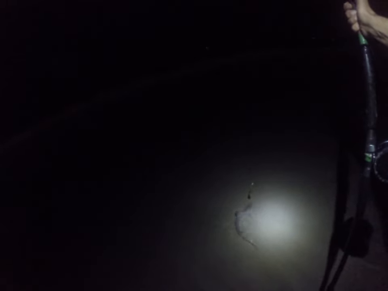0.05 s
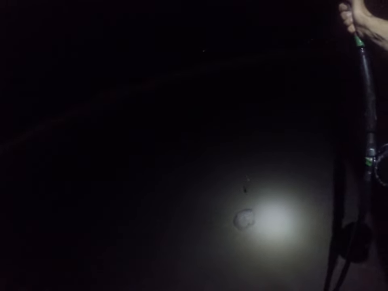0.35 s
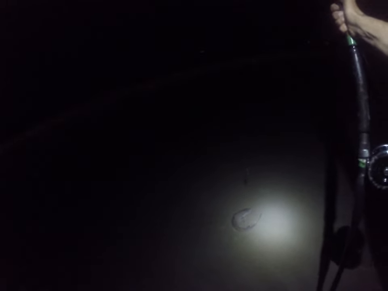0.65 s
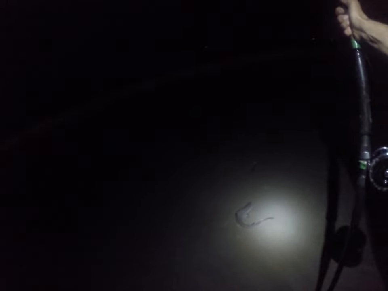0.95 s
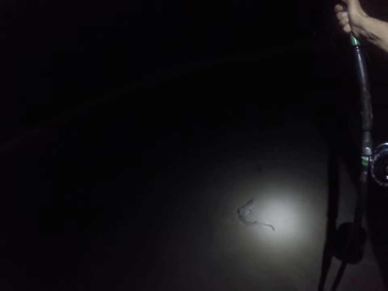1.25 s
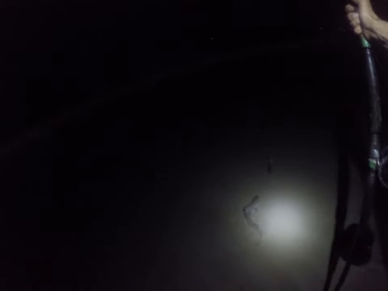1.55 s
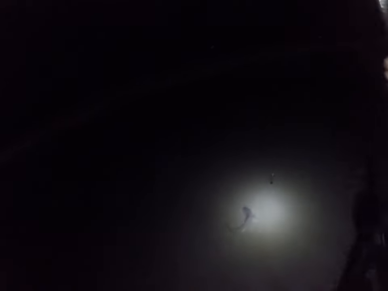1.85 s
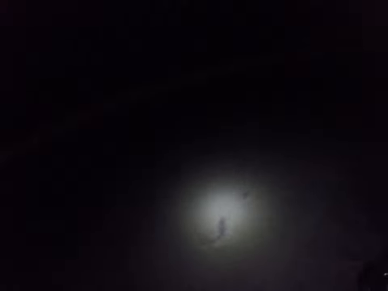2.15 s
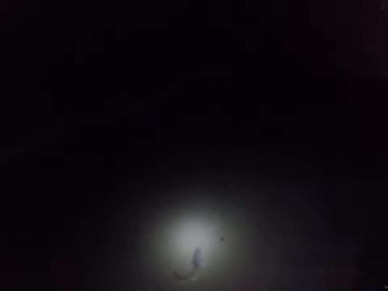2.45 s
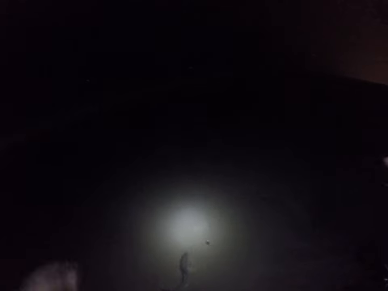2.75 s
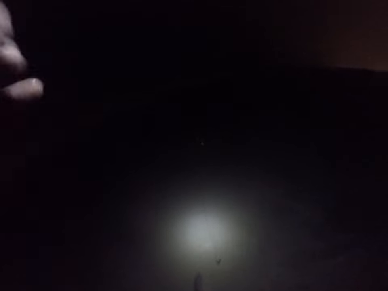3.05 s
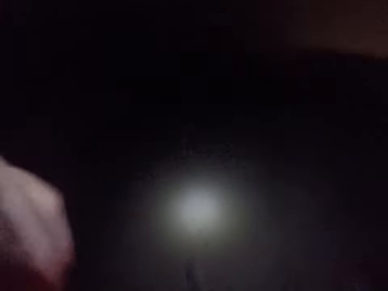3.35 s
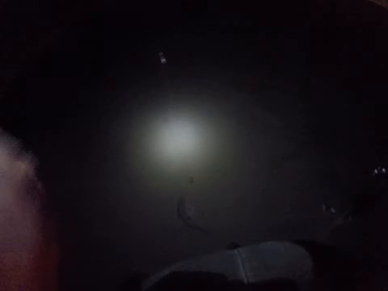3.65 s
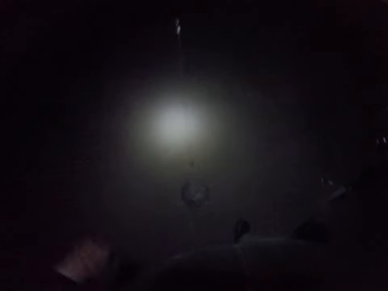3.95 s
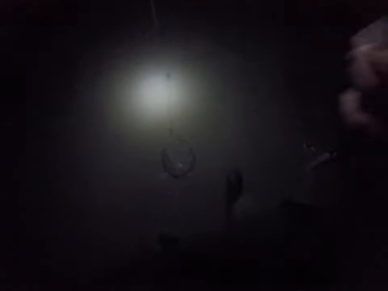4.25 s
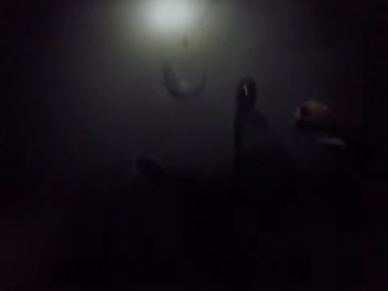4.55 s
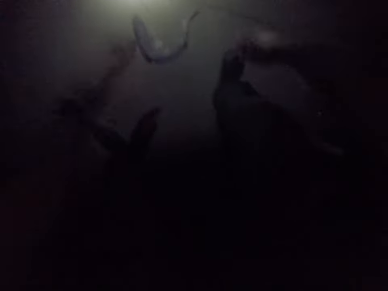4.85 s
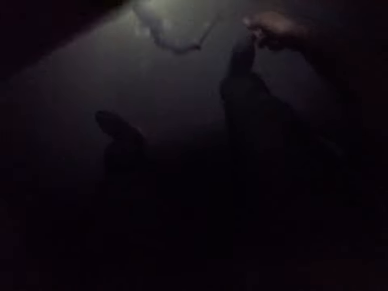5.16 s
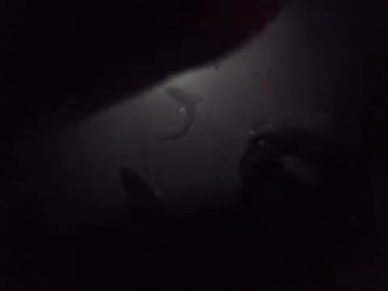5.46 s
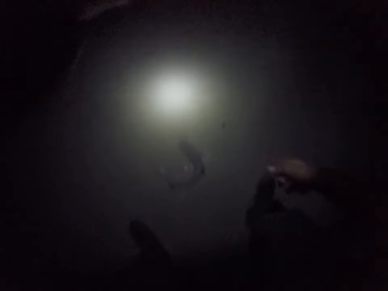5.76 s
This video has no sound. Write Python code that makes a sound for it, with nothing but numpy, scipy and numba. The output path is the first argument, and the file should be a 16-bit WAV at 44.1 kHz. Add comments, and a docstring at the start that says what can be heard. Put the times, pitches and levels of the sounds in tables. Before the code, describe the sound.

Surf roars quietly and steadily throughout on a night beach, sounding slightly hollow through a small camera's housing, with a barely audible high electronic whine. For the first three seconds the swaying camera gives soft, deep, evenly spaced bumps. Clothes swish at about 0.7 seconds, and between 1.7 and 2.8 seconds come a few light knocks, brief rustles and a rumble of wind. From about 3.2 to 3.7 seconds fingers grip the camera: gritty rubbing, deep thumps of air and sharp plastic knocks, loud enough to distort. The surf ducks, then creeps back. Around 4.3 to 5 seconds clothing rustles softly under another low gust. From about 5.1 to 5.8 seconds a second loud cluster of scrapes, thumps and clacks hits the case, pushing the surf down again.

```python
"""A night beach, heard through the housing of a small camera. Surf roars steadily, coloured by the
cavities in front of the microphone; a gusty breeze rumbles on the port and a fisherman's clothes rustle.
Twice the camera is gripped: fingers rub over the case, press air into the port and knock on the plastic,
loud enough to clip; the gain control ducks, and the surf creeps back. Underneath, the swaying camera
bumps softly and its electronics whine."""
import sys
import numpy as np
from scipy import signal
from scipy.fft import rfft, irfft, next_fast_len
from scipy.io import wavfile
from scipy.ndimage import uniform_filter1d
from numba import njit

SR = 44100
rng = np.random.default_rng(int(sys.argv[2]) if len(sys.argv) > 2 else 0)


def transcribe(u):
    """Save the signal u as a 16-bit wav file named by the first command-line argument.

    u: samples, shape (n,) or (channels, n), limited to [-1, 1]; the rate is SR.
    q: integer samples, one column per channel.
    """
    v = np.clip(np.atleast_2d(u).T, -1, 1)
    q = np.round(v * 32767).astype(np.int16)
    wavfile.write(sys.argv[1], SR, q)


N = 256220


def undb(db):
    """Decibels to gain."""
    return 10 ** (np.asarray(db) / 20)


def unit(x):
    """Scale to rms 1."""
    return x / np.sqrt(np.mean(x ** 2))


def curve(rows):
    """An automation curve through (time, value) points."""
    return np.interp(np.arange(N) / SR, *np.transpose(rows))


def add(track, at, sound):
    """Mix a sound in at a time in seconds."""
    start = int(at * SR)
    track[start:start + len(sound)] += sound[:N - start]


def colour(x, points, lifts=(), tilt_db=0):
    """EQ by a smooth spectrum, resonant lifts and a tilt per octave; comes out at rms 1."""
    size = next_fast_len(len(x))
    f = np.maximum(np.arange(size // 2 + 1) * SR / size, 1)
    hz, db = np.transpose(points)
    gain_db = np.interp(np.log(f), np.log(hz), db) + tilt_db * np.log2(f)
    for centre, width, lift_db in lifts:
        gain_db += lift_db * .5 ** ((2 * (f - centre) / width) ** 2)
    return unit(irfft(rfft(x, size) * undb(gain_db), size)[:len(x)])


def walk(rate_hz):
    """Smooth random drift at rms 1."""
    k = int(SR / rate_hz)
    steps = np.repeat(rng.standard_normal(N // k + 1), k)
    return unit(uniform_filter1d(uniform_filter1d(steps, k), k)[:N])


@njit
def running_sum(steps, top):
    """Add up steps, staying between zero and a top."""
    out, total = np.empty(len(steps)), 0.
    for i in range(len(steps)):
        total = min(max(total + steps[i], 0.), top)
        out[i] = total
    return out


def stroke(rise, fall, spectrum, grain_db, tilt_db=0, catch=0, hold=0):
    """Friction: countless tiny slips and optional sharp catches, reaching full level mid-buffer."""
    size, grain = 2 ** 15, 32  # samples
    t = np.arange(-size // 2, size // 2) / SR
    slips = rng.standard_normal(size)
    slips *= undb(grain_db * np.repeat(rng.standard_normal(size // grain), grain))
    catches = (rng.random(size) < 160 / SR) * rng.standard_normal(size)  # about 160 a second
    release = np.maximum(t - hold, 0)
    edge = np.where(t < 0, t / rise, release / fall)
    swell = np.exp(-edge ** 2 / 2 ** .5)
    graze = undb(-14) * np.exp(-np.maximum(-t / .002, release / 0.04))  # faint touch, mostly a tail
    return colour(slips + catch * catches, spectrum, tilt_db=tilt_db) * np.maximum(swell, graze)


def thump(hz, damping):
    """A bump swings the air pressure for a cycle or two; a well damped one is a single push."""
    cycles = hz * np.arange(SR // 4) / SR
    swing = -np.sin(2 * np.pi * cycles) * cycles ** 0.89 * np.exp(-damping * cycles)
    return swing / np.abs(swing).max()


def surf(deep_swell_db=0.3, foam_swell_db=-0.5):
    """A broad roar whose lows and highs swell apart; the housing recolours it as the camera turns."""
    # surf fader: (time [s], level [dB])
    surf_level = [(0, -42), (.7, -40.5), (1.2, -41.5), (3.15, -41.5), (4.3, -41.5), (4.9, -40.5),
                  (5.12, -43.5), (5.81, -38)]
    # tone of the surf: (frequency [Hz], level [dB])
    surf_spectrum = [(20, -1.5), (100, -2), (350, 0), (600, -5.5), (1000, -10.5), (1900, -15.5),
                     (3800, -26), (6600, -24), (8500, -34.5), (11500, -40.5), (14000, -43), (16000, -52)]
    # housing cavities: (centre [Hz], width [Hz], lift facing the sea [dB], lift turned away [dB])
    cavities = [(1536, 330, 2, 12.5), (2339, 357, 10, 10.5), (2842, 280, 11, 9), (3256, 240, 4.5, 9),
                (3990, 1300, -1.5, 5.5), (4680, 560, 4, 3), (5610, 730, 12, 11), (7140, 450, 7.5, -0.5),
                (10070, 1970, 8, 6)]
    # the camera's turn from the sea: (time [s], share turned away [0-1])
    turn_away = [(0, 0.22), (1.6, 0.35), (2.5, 0.8), (3.5, 1), (5.81, 0)]
    noise = rng.standard_normal(N)
    facing = colour(noise, surf_spectrum, [(hz, width, db) for hz, width, db, _ in cavities])
    away = colour(noise, surf_spectrum, [(hz, width, db) for hz, width, _, db in cavities])
    roar = facing + curve(turn_away) * (away - facing)
    deep = signal.sosfilt(signal.butter(1, 700, fs=SR, output="sos"), roar)
    foam = roar - deep
    swelling = deep * undb(deep_swell_db * walk(13)) + foam * undb(foam_swell_db * walk(5.9))
    return swelling * undb(curve(surf_level))


def case_knocks(scrape_s=0.0015, chatter_s=0.019, spot_db=11, detune=0.082):
    """A thump of air, then a scraping contact rings the plastic case and chatters out."""
    # knocks on the case: (time [s], thump pitch [Hz], thump level [dB], damping [per cycle],
    # ring level [dB], pitch of the struck spot [Hz])
    hits = [(1.7148, 242, -15, 2.9, -30.5, 1250), (2.094, 113, -16, 2.5, -39, 1100),
            (2.115, 182, -13.5, 4.4, -33, 1100), (2.4231, 202, -32, 0.94, -22, 2160),
            (3.047, 193, -17, 3.5, -36, 1054), (3.263, 134, -3.5, 10.5, -20, 1200),
            (3.267, 417, -7, 0.82, -3.5, 2170), (3.352, 82.4, 10.5, 2.4, -26, 2710),
            (3.4099, 145, 3, 2.4, 3, 1450), (3.439, 116, 19, 7.2, 1, 1150),
            (3.488, 97, 4.5, 3.6, -46, 1210), (3.6228, 136, -29, 3, 0.5, 2120),
            (3.69, 140, -7.5, 3.6, -7.5, 2500), (4.941, 209, -11, 1.8, -58, 1100),
            (5.193, 286, -4.5, 1.26, -6.5, 2280), (5.214, 95.4, 10, 4.1, -2.5, 3160),
            (5.3079, 270, 4, 4, -1, 2100), (5.348, 97.5, -1, 1.2, 4, 2160),
            (5.403, 172, 18, 8.2, 8.5, 1640), (5.4208, 164, 8, 8.9, -15, 1220),
            (5.559, 73, 7.5, 7.7, 3.5, 1590), (5.7219, 201, -6, 7.1, 3, 2180),
            (5.744, 200, -22, 2.7, -5.5, 1550)]
    # modes of the case: (frequency [Hz], level [dB], t60 [s])
    case_modes = [(390, -4, 0.012), (820, -2.5, 0.0095), (1240, -12.5, 0.0092), (1565, 10.5, 0.0081),
                  (2200, 11, 0.0098), (2640, 1, 0.013), (3700, 7, 0.0077), (5430, 11, 0.0041),
                  (6660, -7, .0026), (8800, -15, 0.0053), (12800, 2, .002)]
    out, t = np.zeros(N), np.arange(SR // 16) / SR
    fingertip = signal.butter(4, 3500, fs=SR, output="sos")
    for at, thump_hz, thump_db, damping, ring_db, spot_hz in hits:
        add(out, at - .001, thump(thump_hz, damping) * undb(thump_db))
        scrape = 0.29 * np.exp(-t / scrape_s)
        chatter = 0.015 * np.exp(-t / chatter_s)
        contact = rng.standard_normal(len(t)) * (scrape + chatter)
        contact[0] += 1  # the impact itself
        soft = signal.sosfilt(fingertip, contact)
        body, ring, tick = np.zeros((3, len(t)))
        for hz, mode_db, t60 in case_modes:
            # the struck spot favours the modes near its pitch
            favour_db = spot_db * np.exp(-(np.log2(hz / spot_hz) / 0.19) ** 2)
            pitch = hz * (1 + detune * rng.standard_normal())
            band = body if hz < 1400 else ring if hz < 4000 else tick
            band += undb(mode_db + favour_db - 60 * t / t60) * np.sin(2 * np.pi * pitch * t)
        body_db = (thump_db + ring_db) / 2 - 4
        # the fingertip softens all but the highest modes
        for push, band, db in (soft, body, body_db), (soft, ring, ring_db), (contact, tick, ring_db - 24):
            sound = signal.fftconvolve(push, band)[:len(t)]
            add(out, at, sound / np.abs(sound).max() * undb(db))
    return out


def finger_rubs():
    """Gritty skin slides on plastic beside the port; each finger pushes air in as it lands."""
    # finger slides: (start [s], hold [s], hiss level [dB], tilt [dB/octave],
    # push pitch [Hz], push level [dB])
    rubs = [(3.183, 0.0035, -23, 4, 68, -19), (3.226, 0.035, -29, 3.5, 46, -8),
            (3.307, 0.026, -17.5, -1, 25, -8), (3.335, 0.016, -7.5, -1, 64, 2.5),
            (3.367, 0.14, -19.5, 1, 37, -8), (3.525, 0.037, -19, 1.5, 15, -5),
            (5.1356, 0.014, -17.5, 1, 45, -1), (5.182, 0.029, -24.5, 1.5, 20, -19),
            (5.25, 0.053, -24, .5, 27, -3.5), (5.321, 0.033, -12, 0, 39, -7),
            (5.372, 0.022, -18.5, 1.3, 38.4, 6.5), (5.423, 0.042, -24, 0, 15.6, -5),
            (5.471, 0.0087, -27, -1, 28.5, 4.5), (5.522, 0.055, -29.5, 1, 12.8, -5),
            (5.639, 0.02, -21.5, -0.5, 16.8, 3), (5.674, 0.014, -0.5, -2.5, 45, 2.5)]
    # tone of skin on plastic: (frequency [Hz], level [dB])
    skin_spectrum = [(60, 15.5), (250, 9), (600, -2), (1150, -2.5), (1900, 0.5), (2900, 1.5), (3600, -8),
                     (5200, -11), (6500, -8), (7600, -16.5), (10000, -22.5), (13000, -30), (15500, -38)]
    out = np.zeros(N)
    for at, hold, db, tilt_db, push_hz, push_db in rubs:
        hiss = stroke(.001, 0.01, skin_spectrum, grain_db=1, tilt_db=tilt_db, catch=13, hold=hold)
        add(out, at - len(hiss) / 2 / SR, hiss * undb(db))
        add(out, at, thump(push_hz, damping=2.6) * undb(push_db))
    return out


def wind(breeze_db=-63, rumble_db=0.5, buffet_db=1.5, flutter_db=0.3):
    """A breeze and its gusts: large eddies rumble on the port; smaller ones flutter above them."""
    # gusts over the breeze: (peak time [s], width [s], level [dB])
    gusts = [(1.94, 0.26, -44.5), (2.43, .05, -49), (3.35, 0.36, -42), (4.75, 0.56, -41.5)]
    # tone of the large eddies: (frequency [Hz], level [dB])
    rumble_spectrum = [(10, 2), (26, 0), (60, -2), (90, -4), (200, -7.5), (600, -66)]
    # tone of the small eddies: (frequency [Hz], level [dB])
    buffet_spectrum = [(20, -20), (70, -8), (120, -1.5), (200, -9), (330, -19), (700, -33), (2000, -70)]
    t = np.arange(N) / SR
    force = undb(breeze_db) + sum(undb(db) * np.exp(-((t - at) / width) ** 2) for at, width, db in gusts)
    rumble = colour(rng.standard_normal(N), rumble_spectrum) * undb(rumble_db)
    buffet = colour(rng.standard_normal(N), buffet_spectrum) * undb(flutter_db * walk(25) + buffet_db)
    return (rumble + buffet) * force


def clothes_rustle():
    """Cloth slides softly as the fisherman moves."""
    # his movements: (peak time [s], rise [s], fall [s], level [dB])
    rustles = [(0.693, 0.05, 0.028, -46), (2.272, 0.07, 0.019, -49.5), (2.433, .0054, 0.021, -40.5),
               (2.744, 0.011, .011, -42.5), (4.37, 0.067, 0.04, -41), (4.57, .14, 0.1, -40),
               (4.851, .08, .2, -45)]
    # tone of the cloth: (frequency [Hz], level [dB])
    cloth_spectrum = [(50, 5), (300, 8), (1000, -1.5), (2000, 0), (2800, 0.5), (3400, -11), (5600, -6),
                      (7500, -26), (15000, -42)]
    out = np.zeros(N)
    for at, rise, fall, db in rustles:
        swish = stroke(rise, fall, cloth_spectrum, grain_db=2)
        add(out, at - len(swish) / 2 / SR, swish * undb(db))
    return out


def camera_sway(count=7, start_s=.256, period_s=.431, level_db=-34.5):
    """The camera sways at an even pace, each time with a soft deep bump."""
    out = np.zeros(N)
    for k in range(count):
        add(out, start_s + k * period_s, thump(hz=39.6, damping=1.7) * undb(level_db))
    return out


def electronics_whine(pitch_hz=12920, wobble_hz=45, frame_hz=30, pulse_db=6, level_db=-74.5):
    """The camera's electronics whine faintly, pulsing with each frame."""
    phase = 2 * np.pi * np.cumsum(pitch_hz + wobble_hz * walk(300)) / SR
    pulse = np.cos(2 * np.pi * frame_hz * np.arange(N) / SR)
    return unit(np.sin(phase) * undb(pulse_db * pulse)) * undb(level_db)


def scene():
    """Beach, wind and handling at one microphone."""
    beach = surf() + wind()
    handling = camera_sway() + clothes_rustle() + finger_rubs() + case_knocks()
    return (beach + handling + electronics_whine())[None]


def gain_control(x, trip_db=-16.5, deepest_db=17., duck_db_per_s=128, recover_db_per_s=21, sense_s=0.037):
    """The gain falls fast while the sound is too loud, and creeps back afterwards."""
    memory = np.exp(-1 / (sense_s * SR))
    power = signal.lfilter([1 - memory], [1, -memory], x ** 2)
    too_loud = np.clip(power / undb(trip_db) ** 2 - .5, 0, 1)
    cut_steps_db = (too_loud * duck_db_per_s - (1 - too_loud) * recover_db_per_s) / SR
    return x * undb(-running_sum(cut_steps_db, deepest_db))


def record(dry, low_cut_hz=9, top_hz=15600):
    """The microphone leaks steady pressure; the gain ducks; hard bumps still clip; the top is cut off."""
    low_cut = signal.butter(1, low_cut_hz, "high", fs=SR, output="sos")
    high_cut = signal.ellip(10, .2, 80, top_hz, fs=SR, output="sos")
    ducked = gain_control(signal.sosfilt(low_cut, dry[0]))
    return signal.sosfilt(high_cut, np.clip(ducked, -1, 1))[None]


dry = scene()
out = record(dry)
transcribe(out)
```